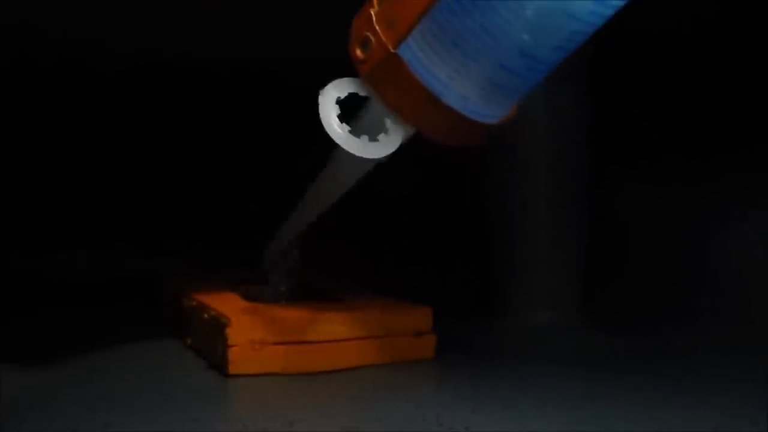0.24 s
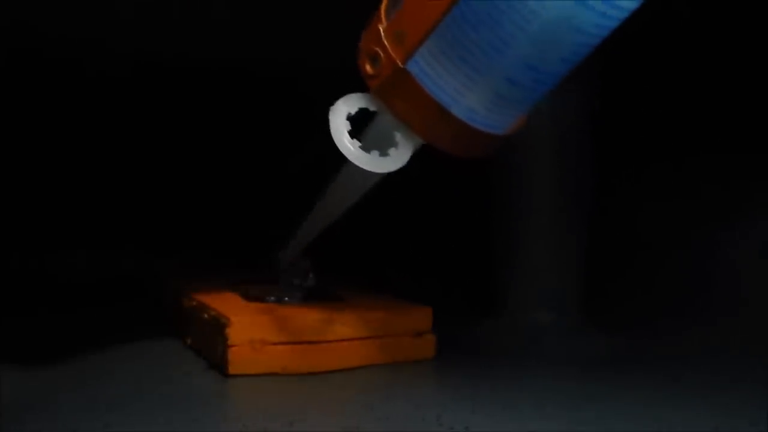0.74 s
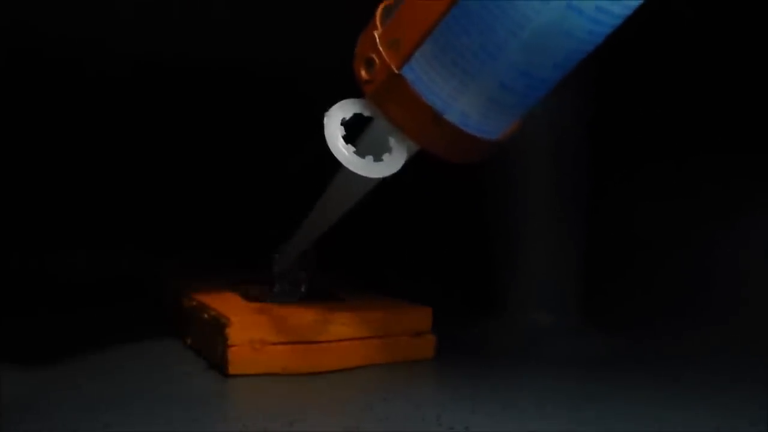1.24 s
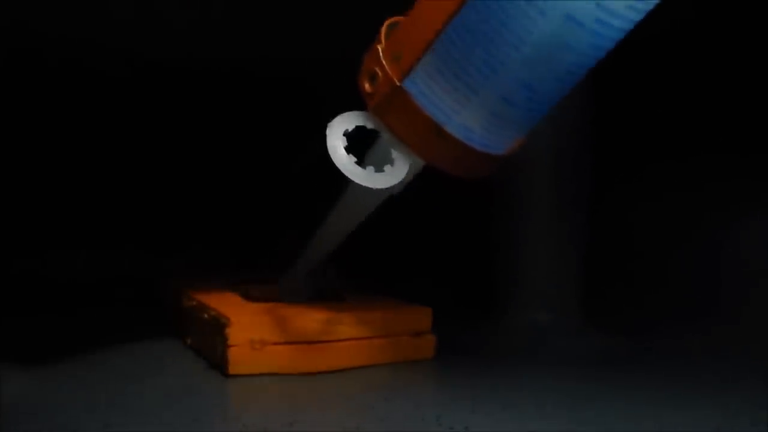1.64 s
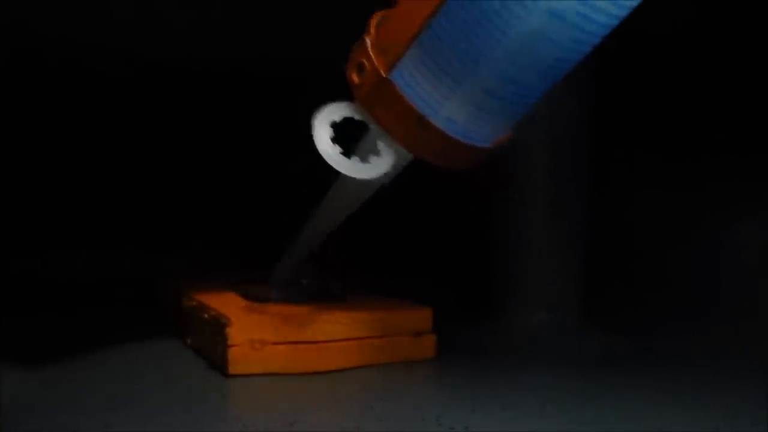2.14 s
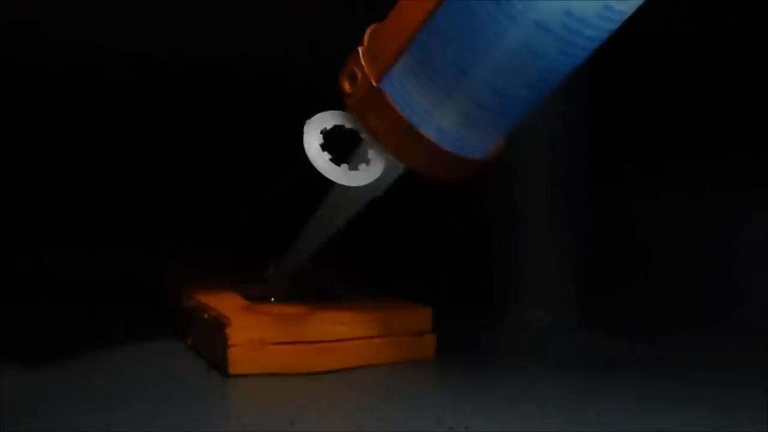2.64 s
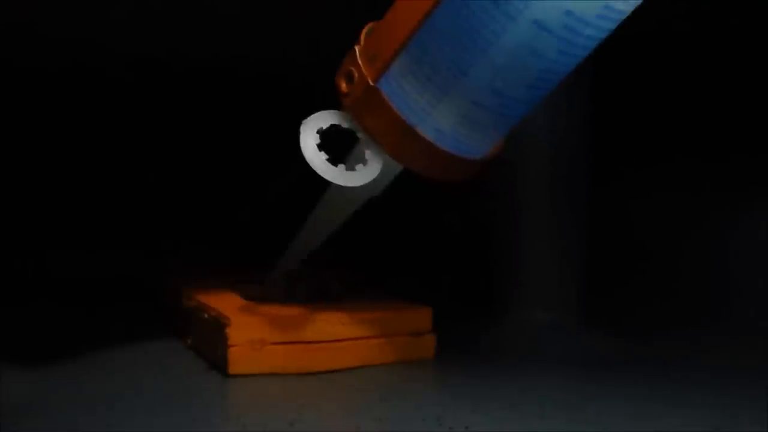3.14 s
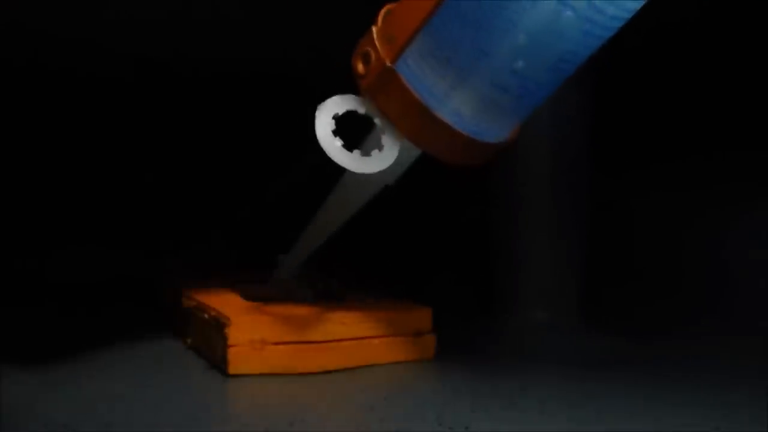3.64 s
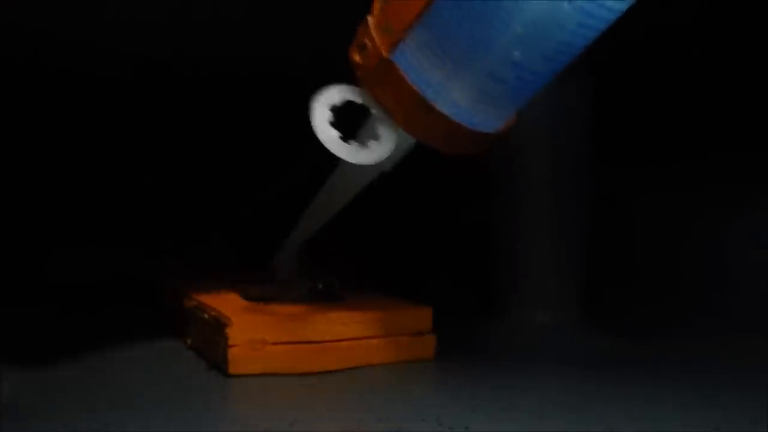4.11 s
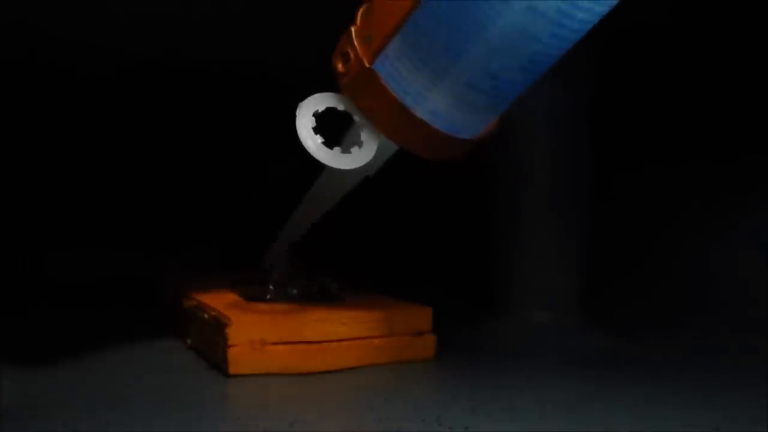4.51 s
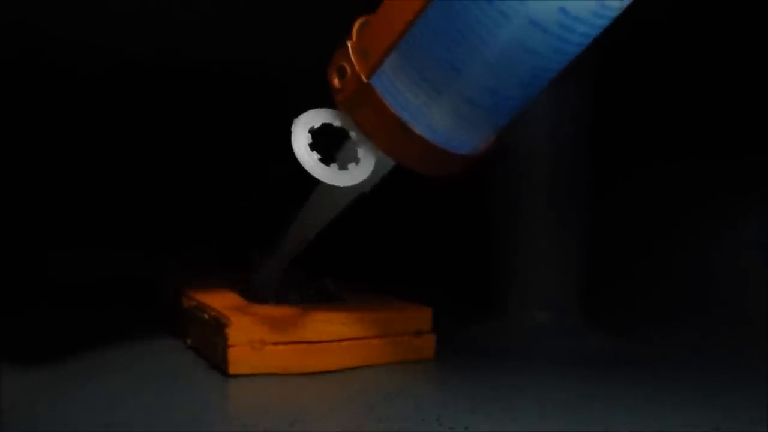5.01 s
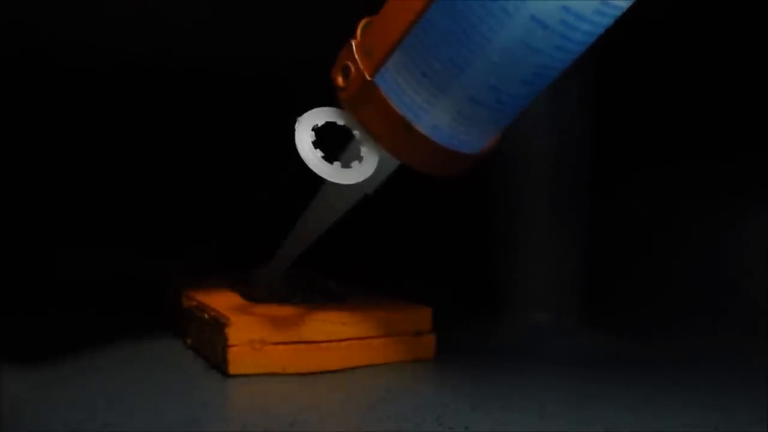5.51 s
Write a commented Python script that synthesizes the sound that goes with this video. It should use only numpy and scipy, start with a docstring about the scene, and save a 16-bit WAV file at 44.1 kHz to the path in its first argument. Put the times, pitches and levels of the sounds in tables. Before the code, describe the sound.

A caulking gun is squeezed by hand over a workbench in a small workshop, close to the microphone, with a soft, steady hiss throughout. It opens with short plunger scrapes, light clicks and a soft bump in the first 0.3 seconds, then a faint scrape near 0.7. At 1.6 seconds the trigger clacks loudly and the gun thuds on the bench; the metal frame rings briefly, the room booms, and the hiss ducks for a moment. Quieter scrapes come at 2 and 2.6 seconds, and a soft bump at 2.8. From 3.4 to 3.6 seconds loud thuds and clacks bunch together, followed at 3.7 by a steel catch snapping with a bright ring. Duller, boomy knocks and scrapes run from 3.9 to 4.3 seconds, thinning out by 4.8. After a pause, three light scrapes and two small clacks arrive between 5.5 and 5.7 seconds.

```python
"""First comes a short scrape: a caulking gun is squeezed by hand over a workbench in a small workshop.
Close to the microphone, its trigger clacks and its plunger sticks and slips, shaking the metal frame.
The gun thuds against the bench, the room booms, and a steel catch snaps on the rod with a bright ring.
A steady hiss lies underneath. After a loud clack, automatic gain control turns everything down for a
moment, so the hiss ducks too."""
import sys
import numpy as np
from scipy import signal
from scipy.fft import rfft, irfft
from scipy.io import wavfile
from scipy.ndimage import uniform_filter1d

SR = 44100
rng = np.random.default_rng(int(sys.argv[2]) if len(sys.argv) > 2 else 0)


def int16_out(signal):
    """Quantize to a 16-bit WAV file."""
    q = np.round(np.clip(np.atleast_2d(signal).T, -1, 1) * 32767)
    wavfile.write(sys.argv[1], SR, q.astype(np.int16))


N = 254000
AGE = np.arange(32768) / SR  # seconds since a single sound began

# Levels are relative; t60 is the time a sound takes to fade by 60 dB.
# the trigger hits the frame: t/s, level/dB, recoil f/Hz
TRIGGER_CLACKS = [(0.177, -39, 390), (0.188, -31.5, 292), (1.626, -8.5, 250), (1.632, -11.5, 310),
                  (2.568, -36, 410), (3.470, -10, 344), (3.6142, -8, 393), (3.632, -13.5, 423),
                  (4.049, -18.5, 382), (4.103, -34, 300), (4.418, -36.5, 244), (4.518, -41, 406),
                  (5.602, -26, 415), (5.685, -24.5, 408)]
# the gun jerks against the bench: t/s, level/dB
BENCH_THUDS = [(0.211, -24.5), (1.6253, -8), (2.792, -24.5), (3.4349, -11.5), (3.461, -12), (4.028, -21),
               (4.155, -31), (4.237, -20)]
# the plunger scrapes: peak t/s, length/s, level/dB, weight on the bench/0-1
PLUNGER_SCRAPES = [(0.005, 0.079, -25.5, 0.32), (0.076, 0.059, -28.5, 0.8), (0.212, 0.073, -17.5, 0.82),
                   (0.266, 0.096, -26.5, 0.83), (0.650, 0.067, -28, .85), (1.325, 0.092, -36, 0.3),
                   (1.595, 0.066, -22, 0.74), (2.024, 0.081, -19.5, 0), (2.585, 0.07, -32.5, 0.6),
                   (2.826, .07, -25.5, 1), (3.900, .05, -17.5, 0.49), (4.190, 0.22, -22, 0.43),
                   (4.249, .075, -18, 0.48), (4.449, 0.054, -27.5, .75), (4.510, .08, -37, 0.2),
                   (4.755, 0.055, -27, 0.21), (5.506, 0.082, -25, 0.1), (5.628, 0.074, -23, 0),
                   (5.722, 0.068, -21.5, 0.01)]
# how hard the hand bears down: t/s, grip/0-1
HAND_GRIP = [(2.6, 0), (2.8, 0.53), (3.47, 0.46), (3.62, 0.24), (3.9, 0.25), (4.04, 1), (4.3, 0.73),
             (4.45, 0.36), (4.8, 0.73), (5.0, 0)]
# ringing tones of the frame with its cartridge: f/Hz, level/dB, t60/s
FRAME_TONES = [(294, -3.5, 0.049), (330.5, -4, 0.059), (366, -22, 0.077), (425.1, 2, 0.14),
               (450, -3, 0.053), (588, -11.5, 0.038), (626.4, -6, 0.18), (686, -25, 0.32),
               (727, -19.5, 0.41), (765, -18, 0.31), (898, -20.5, 0.29), (1013, -20.5, 0.22),
               (1100, -16.5, 0.32), (1178, -16.5, 0.14), (1282, -28.5, 0.33), (1447, -28.5, 0.15),
               (2178, -23, 0.082), (2222, -26, 0.11)]
# the frame's clatter, which has no pitch: f/Hz, level/dB
CLATTER_COLOUR = [(120, -20), (270, 0), (450, 6), (800, -2.5), (1250, -7.5), (1600, -17.5), (2350, -17.5),
                  (2900, -30), (5500, -39), (10000, -47.5), (16000, -63)]
# ringing tones of the bench: f/Hz, level/dB, t60/s
BENCH_TONES = [(112.4, -4, 0.13), (140.2, 1.5, 0.11), (158.8, 4.5, 0.2), (194, -5.5, 0.29),
               (227.7, -5, 0.14)]
# the catch snaps on the rod (only the first one's tail is heard): t/s, level/dB, treble/dB per octave
CATCH_SNAPS = [(-0.09, -21, -10), (3.667, -11.5, 5.5)]
# the snap's bright, hissy noise, plus a narrow gap at 11700 Hz that is not the snap's own: f/Hz, level/dB
BRIGHT_NOISE_FILTER = [(1500, -10), (2900, -14), (3900, -7), (4800, 0), (5400, 8), (6200, -3.5), (7700, -5),
                       (9200, -8.5), (10700, -2.5), (11700, -20), (12700, 2), (14200, -2), (15600, -1.5)]
# ringing tones of the steel catch plate: f/Hz, level/dB, t60/s
CATCH_TONES = [(5350, -8, 0.29), (7500, -13, .25), (10700, -3, .2), (12760, -5, 0.22), (13800, -6, .22),
               (13800, -6, .18)]
# the room's boom, from waves standing between its walls: f/Hz, level/dB, t60/s
BOOM_TONES = [(44.4, -40, 0.24), (55.5, 0, 1), (67.2, 8.5, 0.33), (90.9, -5, 1), (122.4, -7.5, 0.96),
              (166.4, -4.5, 0.95)]
# how long the workshop echoes: f/Hz, t60/s
ECHO_TIMES = [(200, 0.29), (1000, 0.65), (3000, 0.65), (5400, 0.47), (8000, 0.42), (14000, 0.2)]
# the background hiss: f/Hz, level/dB
HISS_COLOUR = [(20, -18.5), (53, -7.5), (100, 0.5), (165, 2.5), (260, -1.5), (620, -5.5), (1100, -12),
               (2200, -18), (2900, -24.5), (3600, -22.5), (7000, -28), (11000, -33.5), (13600, -38),
               (16000, -36)]
# the treble dips after the hardest clack, with one quick flick up: t/s, level/dB
TREBLE_DIP = [(1.635, -6), (1.70, -9), (1.726, -8), (1.731, 5.5), (1.80, -7)]

RISE_SHARE = 0.42  # part of a scrape's length spent swelling
# A tilt is in dB per octave: above zero brightens a sound, below zero dulls it.
GRIP_TILT, GRIP_BOOM_DB = -8, 13  # a full grip dulls the frame and drives more boom into the room


def gun(echo_db=-15, boom_build_s=0.031):
    """All clacks, thuds and scrapes with their echo; the room's boom takes a moment to build."""
    boom = ringing(BOOM_TONES) * (1 - np.exp(-(AGE / boom_build_s) ** 2))
    bodies = ringing(FRAME_TONES), ringing(BENCH_TONES), boom
    out = np.zeros(N)
    for s, db, recoil_hz in TRIGGER_CLACKS:
        add(out, s, gain_of(db) * clack(bodies, at_time(HAND_GRIP, s), recoil_hz))
    for s, db in BENCH_THUDS:
        add(out, s, gain_of(db) * thud(bodies, at_time(HAND_GRIP, s), db))
    for s, length, db, weight in PLUNGER_SCRAPES:
        start = s - 2 * RISE_SHARE * length
        add(out, start, gain_of(db) * scrape(bodies, at_time(HAND_GRIP, s), length, weight))
    return out + gain_of(echo_db) * signal.fftconvolve(out, room_echo())[:N]


def clack(bodies, grip, recoil_hz):
    """The trigger's hard blow gives a quick recoil and rings the frame more than the bench."""
    ring = shake(knock(), bodies, frame_db=0, tilt=0.5 + GRIP_TILT * grip,
                 bench_db=-8, boom_db=-19 + GRIP_BOOM_DB * grip, clatter_db=-5)
    return recoil(recoil_hz) + ring


def thud(bodies, grip, db):
    """A heavy blow on the bench: a slow recoil and a boom. The louder it is, the duller the frame."""
    tilt = 1.0 - 0.2 * db + GRIP_TILT * grip
    ring = shake(knock(), bodies, frame_db=-11, tilt=tilt, bench_db=-7, boom_db=-9, clatter_db=6.5)
    return recoil(hz=152) + ring


def scrape(bodies, grip, length, weight):
    """The plunger's slips swell and fade; weight on the bench shifts the sound from frame to bench."""
    rise, fall = RISE_SHARE * length, (1 - RISE_SHARE) * length
    from_peak = AGE - 2 * rise
    swell = np.exp(-2 * (from_peak / rise) ** 2 / (1 + abs(from_peak / rise)))
    fade = np.exp(-2 * abs(from_peak) / fall)
    force = slips(per_s=2000, spread_db=5) * np.where(from_peak < 0, swell, fade)
    bench_db = -3 * (1 - weight)
    return shake(force, bodies, frame_db=-15 * weight, tilt=1.3 + GRIP_TILT * grip,
                 bench_db=bench_db, boom_db=bench_db - 15 + GRIP_BOOM_DB * grip, clatter_db=-3)


def recoil(hz, peak_s=0.003):
    """The gun jerks in the hand: a few swings that die quickly."""
    return set_peak(AGE * np.exp(-AGE / peak_s) * np.sin(2 * np.pi * hz * AGE), db=0)


def knock(rattle=0.69, rattle_s=0.019):
    """The force of one blow, followed by a short rattle of loose parts."""
    force = slips(per_s=1500, spread_db=1) * np.exp(-AGE / rattle_s)
    force *= rattle / (np.linalg.norm(force) + 1e-9)
    force[0] += 1
    return force


def slips(per_s, spread_db):
    """Parts stick and slip, making tiny random taps of uneven size."""
    chance, size, sign = rng.uniform(-1, 1, (3, len(AGE)))
    return gain_of(spread_db * size) * np.sign(sign) * (abs(chance) < per_s / SR)


def shake(force, bodies, frame_db, tilt, bench_db, boom_db, clatter_db, size=12000):
    """A force rings the gun's frame, passes into the bench and makes the room boom."""
    frame, bench, boom = bodies
    frame = frame[:size].copy()
    add(frame, 0, gain_of(clatter_db) * clatter())
    frame = coloured(frame, lambda hz: tilt * np.log2(np.clip(hz, 300, 6000) / 500))
    out = np.zeros(len(AGE))
    for body, db in ((frame, frame_db), (bench[:size], bench_db), (boom, boom_db)):
        add(out, 0, set_peak(signal.fftconvolve(force[:size], body), db))
    return out


def clatter(t60=0.11):
    """Frame tones too close together to tell apart blur into a dying noise."""
    t = AGE[AGE < t60]
    noise = rng.standard_normal(len(AGE))[:len(t)] * decay(t, t60)
    return unit_energy(coloured(noise, lambda hz: at_pitch(CLATTER_COLOUR, hz)))


def catch(skid_s=0.0058, echo_db=-1, ring_db=-17):
    """Steel strikes steel and skids briefly; the plate rings and the snap echoes round the room."""
    out = np.zeros(N)
    for s, db, tilt in CATCH_SNAPS:
        skid = rng.standard_normal(len(AGE)) * np.exp(-(AGE / skid_s) ** 2)
        snap = set_peak(coloured(skid, lambda hz: at_pitch(BRIGHT_NOISE_FILTER, hz)), db)
        echo = unit_energy(coloured(room_echo(), lambda hz: at_pitch(BRIGHT_NOISE_FILTER, hz)))
        tail = gain_of(echo_db) * echo + gain_of(ring_db) * ringing(CATCH_TONES)
        sound = snap + np.linalg.norm(snap) * tail
        # the gentler snap has less treble
        add(out, s, coloured(sound, lambda hz: tilt * np.log2(np.maximum(hz / 5400, 1))))
    return out


def ringing(tones):
    """A struck object rings with fading tones; neighbours start in opposite directions."""
    return unit_energy(sum((-1) ** k * gain_of(db) * decay(AGE, t60) * np.sin(2 * np.pi * hz * AGE)
                           for k, (hz, db, t60) in enumerate(tones)))


def room_echo(build_s=0.014, size=256):
    """Many reflections blend into noise, each band of pitch dying at its own speed."""
    hz, t, bands = signal.stft(rng.standard_normal(len(AGE)), SR, nperseg=size)
    bands *= decay(t, at_pitch(ECHO_TIMES, hz)[:, None])
    tail = signal.istft(bands, SR, nperseg=size)[1][:len(AGE)]
    return unit_energy(tail * (1 - np.exp(-AGE / build_s)))


def hiss(db=-41.5):
    """Steady noise from the workshop's air and the microphone."""
    colour = gain_of(at_pitch(HISS_COLOUR, np.fft.rfftfreq(N, 1 / SR)))
    noise = irfft(rfft(rng.standard_normal(N)) * colour, N)
    return gain_of(db) * noise / noise.std()


def gain_of(db):
    """Turns decibels into a number to multiply by."""
    return 10 ** (np.asarray(db) / 20)


def decay(t, t60):
    """A fade that falls 60 dB every t60 seconds."""
    return np.exp(-np.log(1000) * t / t60)


def unit_energy(x):
    """Scales a sound so that its squared samples add up to 1."""
    return x / np.linalg.norm(x)


def set_peak(x, db, size=300):
    """Scales a sound so that its loudest few milliseconds have the given level."""
    peak_power = uniform_filter1d(x ** 2, size, mode="constant").max()
    return x * gain_of(db) / np.sqrt(peak_power + 1e-20)


def at_time(table, s):
    """Reads between a table's rows at time s; zero outside the table."""
    return np.interp(s, *np.transpose(table), left=0, right=0)


def at_pitch(table, hz):
    """Reads between a table's rows at frequency hz, with octaves evenly spaced."""
    f, value = np.transpose(table)
    return np.interp(np.log(hz + 1), np.log(f + 1), value)


def add(mix, s, sound):
    """Adds a sound at time s, keeping the part that lies inside the mix."""
    start = round(s * SR)
    sound = sound[max(-start, 0):]
    part = mix[max(start, 0):][:len(sound)]
    part += sound[:len(part)]


def coloured(x, db_at, size=4096):
    """Turns each frequency up or down by db_at(hz), with no ringing ahead of the sound."""
    hz = abs(np.fft.fftfreq(size, 1 / SR))
    log_gain = np.log(gain_of(db_at(hz)))
    response = np.exp(np.conj(signal.hilbert(log_gain)))
    taps = np.fft.ifft(response).real[:size // 2]
    return signal.fftconvolve(x, taps)[:len(x)]


def hold_peaks(over_db, fall_db_per_s):
    """Follows a level up at once and lets it down at a steady rate."""
    fall = np.arange(N) / SR * fall_db_per_s
    return np.maximum.accumulate(np.maximum(over_db, 0) + fall) - fall


def gain_control(x, threshold_db=-19, attack_s=0.054, size=300):
    """Loud peaks pull the volume down; most of it returns quickly, the rest over seconds."""
    over_db = 10 * np.log10(abs(uniform_filter1d(x ** 2, size)) + 1e-12) - threshold_db
    quick_cut_db = 0.61 * hold_peaks(over_db, fall_db_per_s=46)
    slow_cut_db = 0.12 * hold_peaks(over_db, fall_db_per_s=4.5)
    keep = np.exp(-1 / (attack_s * SR))
    smooth_cut_db = signal.lfilter([1 - keep], [1, -keep], quick_cut_db + slow_cut_db)
    return x / gain_of(smooth_cut_db)


def scene():
    """Gun, catch and hiss at one microphone."""
    return (gun() + catch() + hiss())[None]


def record(dry, low_cut_hz=33, treble_hz=2600, high_cut_hz=15800):
    """Cuts rumble, ducks after loud peaks, dips the treble briefly, clips and cuts the very top."""
    x = signal.sosfilt(signal.butter(3, low_cut_hz, "high", fs=SR, output="sos"), dry[0])
    x = gain_control(x)
    treble = signal.sosfiltfilt(signal.butter(2, treble_hz, "high", fs=SR, output="sos"), x)
    treble_gain = gain_of(at_time(TREBLE_DIP, np.arange(N) / SR))
    x = np.clip(x + treble * (treble_gain - 1), -1, 1)
    high_cut = signal.firwin(511, high_cut_hz, window=("kaiser", 9), fs=SR)
    return signal.oaconvolve(x, high_cut, "same")[None]


dry = scene()
out = record(dry)
int16_out(out)
```